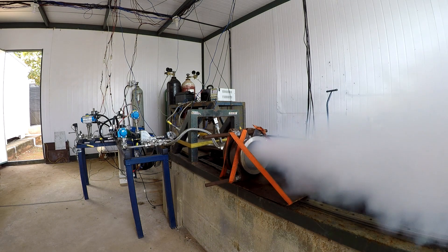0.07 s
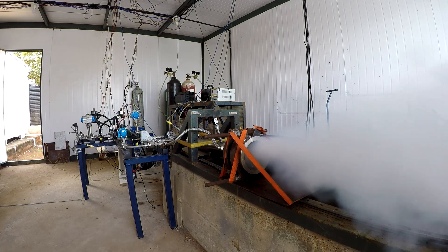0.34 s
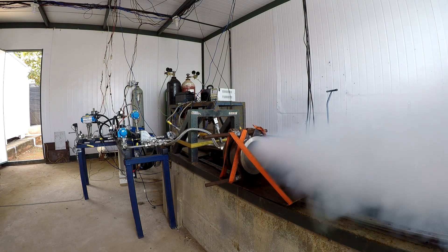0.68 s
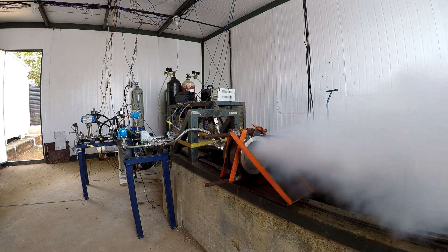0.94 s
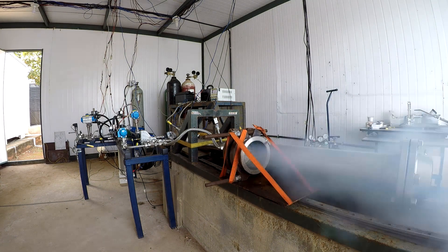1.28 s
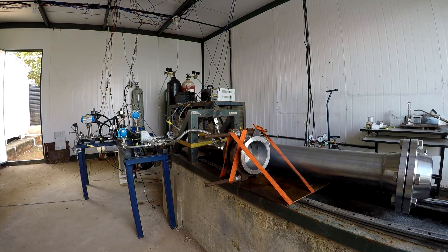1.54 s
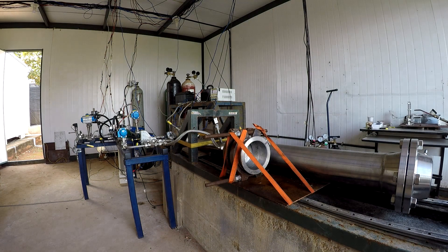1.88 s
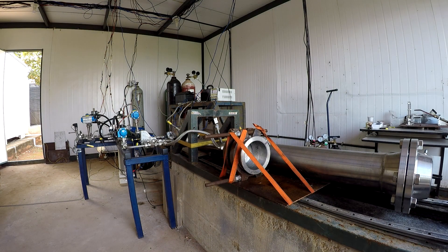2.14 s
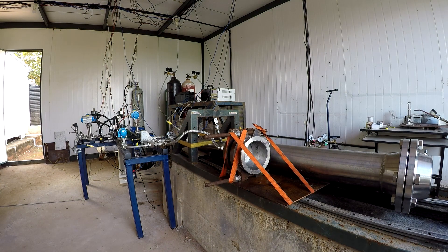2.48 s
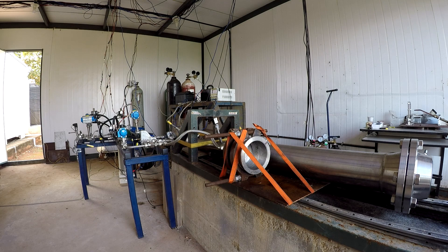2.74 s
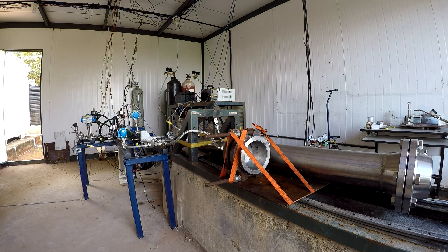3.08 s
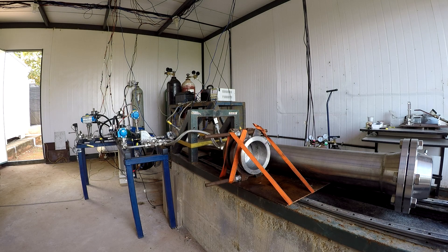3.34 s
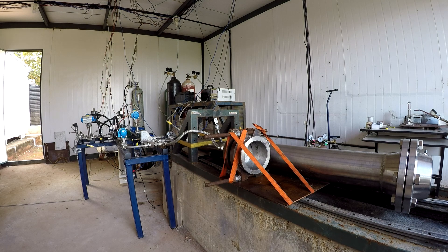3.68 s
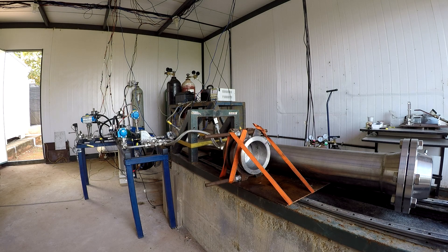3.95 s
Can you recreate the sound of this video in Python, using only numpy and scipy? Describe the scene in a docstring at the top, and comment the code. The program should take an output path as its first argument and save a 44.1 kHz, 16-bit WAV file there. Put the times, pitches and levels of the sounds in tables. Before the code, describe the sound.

A loud roaring hiss of gas cuts off, leaving steel ringing over a quiet equipment hum.

```python
"""Gas blast in a steel duct

Gas rushes from a nozzle into a steel duct in a small room, with a low roar and a broad hiss.
The flow thins and brightens, whistles briefly and is shut off. The steel rings on over humming
equipment. The camera's gain control, pushed down by the blast, slowly brings the quiet room back up."""
import sys
import numpy as np
from scipy import signal
from scipy.fft import rfft, irfft
from scipy.io import wavfile
from scipy.ndimage import uniform_filter1d, minimum_filter1d

SR = 44100
rng = np.random.default_rng(int(sys.argv[2]) if len(sys.argv) > 2 else 0)


def log_audio(samples):
    """Write samples as a 16-bit WAV file to the path given in sys.argv[1]."""
    # one column per channel
    frames = np.atleast_2d(samples).T
    # limit to full scale, then quantise
    limited = np.clip(frames, -1, 1)
    pcm = np.round(limited * 32767).astype(np.int16)
    wavfile.write(sys.argv[1], SR, pcm)


N = 176400
T = np.arange(-SR, N) / SR  # time in seconds; the jet starts one second before we listen

# How loud the jet is. Each row: time in seconds, roar level in dB, hiss level in dB.
# All levels in these tables come before the gain control.
JET_LEVELS = [(0, 0, -2), (.9, 0, -0.5), (1.2, -2, -1.5), (1.33, -4.5, -4.5), (1.43, -5, -6),
              (1.52, -11.5, -13), (1.62, -18.5, -16.5), (1.72, -26, -26), (1.81, -25.5, -32)]
# The fine sizzle, strongest as the flow thins. Each row: time in seconds, level in dB.
SIZZLE_LEVELS = [(0, -24), (1.0, -13.5), (1.2, -8), (1.34, -3.5), (1.42, -5.5), (1.55, -10), (1.7, -16),
                 (1.81, -17)]
# The tone colours of the jet's three noises. Each row: frequency in Hz, relative strength in dB.
ROAR_SPECTRUM = [(12, -16), (28, -8), (50, -10), (75, -7.5), (95, -16), (125, -12), (200, -11.5),
                 (320, -6.5), (440, -2.5), (560, -1), (690, -5), (780, -13), (950, -20.5), (1500, -40),
                 (4000, -70)]
HISS_SPECTRUM = [(300, -17), (900, -6.5), (1150, -5), (1430, 0), (1900, -3.5), (2500, -4), (3300, -1),
                 (4100, 0), (4750, -2.5), (5850, -1), (6400, -6), (7300, -10.5), (8600, -6.5),
                 (9700, -10.5), (12400, -16), (13100, -15), (15500, -20.5)]
SIZZLE_SPECTRUM = [(2000, -14), (5000, -2), (7300, -5), (8900, -1), (10300, -3), (11200, -5.5), (12400, -2),
                   (13100, -8.5), (15500, -5.5)]
# Where the air in the duct resonates. Each row: frequency in Hz, width in Hz, boost in dB.
DUCT_RESONANCES = [(374, 34, 1), (433, 19, 5.5), (542.4, 19, 9), (674, 28, 1)]
# The whistle of the last gas. Each row: time in seconds, pitch in Hz, level in dB.
WHISTLE_PATH = [(1.5, 4800, -25.5), (1.6, 4870, -24), (1.7, 4950, -29), (1.82, 5036, -27.5)]
# The steel's ringing notes, each with a slightly higher twin. Each row: pitch in Hz, level in dB under
# the opening jet, seconds to fade by 60 dB, gap to the twin in Hz, twin's size as a share of the note.
STEEL_NOTES = [(534.8, -44.5, 8.8, 0.693, 0.18), (1400, -54, 5.8, 1, .2), (1703, -34, 3, 0.21, 0.22),
               (2100, -57, 6.9, .9, .2), (2760, -38, 4.3, 0.82, 0.21), (3334, -44.5, 6.64, 0.786, 0.41),
               (4370, -50.5, 7.1, 7, 0.44), (4450, -56, 5.5, 4, .5), (4651, -51.5, 4.7, 5.5, .5),
               (5240, -50.5, 6.4, 9, 0.53), (5313, -55, 5.3, 3, .6), (5600, -53, 5.7, 6, 0.53),
               (6190, -54, 7.1, 19, 0.62), (7200, -54, 4.5, 8, .6), (7300, -55, 5.1, 5, .6),
               (10300, -64, 5.5, 3.9, .4)]
# The tone colour of the steel's weak overtones. Each row: frequency in Hz, relative strength in dB.
SHIMMER_SPECTRUM = [(2000, -19), (2850, 0), (3700, -7.5), (4600, 0), (6300, -2), (6700, -5), (7200, 4),
                    (8000, -2), (9500, -12), (12500, -24), (15000, -24)]
# The equipment's hum. Each row: pitch in Hz, level in dB, typical waver in dB.
HUM_TONES = [(373.5, -49.5, 2.7), (1136, -56, 1), (8355, -64.5, 0)]
# The tone colours of the background noises. Each row: frequency in Hz, relative strength in dB.
RUMBLE_SPECTRUM = [(10, -10), (22, 0), (38, 3), (56, -3), (80, -2), (94, -11), (106, -6), (125, -17),
                   (160, -30), (400, -50.5)]
AIR_SPECTRUM = [(60, -6), (150, -6), (190, -2.5), (240, -1.5), (275, -1), (330, -1.5), (430, 0), (490, -7),
                (700, -7.5), (850, -8.5), (1200, -8), (1800, -14), (3000, -17), (5000, -22), (8000, -28.5),
                (11000, -35), (15500, -44)]
FAINT_HISS_SPECTRUM = [(2000, -6), (6000, 3), (10000, -4), (15500, -15)]
# Room resonances in the rumble and air noise. Each row: frequency in Hz, width in Hz, boost in dB.
RUMBLE_RESONANCES = [(80.5, 11.4, 8.5)]
AIR_RESONANCES = [(241, 20, 6), (308, 25, 3.5), (431, 28, 2.5), (687, 43, 6.5)]
# A faint treble hiss that comes and goes. Each row: time in seconds, level in dB.
FAINT_HISS_LEVELS = [(2.3, -55.5), (2.95, -61), (3.15, -61), (3.29, -74), (3.4, -65), (3.56, -63),
                     (3.74, -82), (3.92, -61), (4, -65)]


def jet(roar_flutter_db=1.54, hiss_flutter_db=0.5, flutter_hz=45):
    """Swirling gas roars in the duct, while the nozzle hisses, sizzles and finally whistles."""
    roar = noise(ROAR_SPECTRUM, DUCT_RESONANCES)
    roar *= from_db(curve(JET_LEVELS, column=1) + roar_flutter_db * wobble(flutter_hz))
    hiss = noise(HISS_SPECTRUM) * from_db(curve(JET_LEVELS, column=2))
    sizzle = noise(SIZZLE_SPECTRUM) * from_db(curve(SIZZLE_LEVELS))
    nozzle = whistle() + (hiss + sizzle) * from_db(hiss_flutter_db * wobble(flutter_hz))
    return (roar + nozzle) * valve()


def whistle(fade_in_s=0.063, jitter_hz=29.7, flutter_db=4):
    """The last of the gas makes a shaky, slightly rising note at the nozzle."""
    start_s = WHISTLE_PATH[0][0]
    fade_in = np.clip((T - start_s) / fade_in_s, 0, 1)
    note = tone(curve(WHISTLE_PATH, column=1) + jitter_hz * wobble(122))
    level_db = curve(WHISTLE_PATH, column=2) + flutter_db * wobble(80)
    return fade_in * note * from_db(level_db)


def valve(shut_s=1.795, fall_db_per_s=450):
    """The valve stays open (a gain of 1), then quickly chokes off the gas."""
    return from_db(-fall_db_per_s * np.maximum(T - shut_s, 0))


def steel(in_step_s=1.6):
    """The jet sets the duct ringing. Each note and its twin slip in and out of step, so they throb."""
    opening_hiss_db = JET_LEVELS[0][2]
    jet_power = (from_db(curve(JET_LEVELS, column=2) - opening_hiss_db) * valve()) ** 2
    phase_per_hz = 2 * np.pi * (T - in_step_s)
    ring = 0
    for hz, db, fade_s, gap_hz, twin_share in STEEL_NOTES:
        pair = np.sin(hz * phase_per_hz) + twin_share * np.sin((hz + gap_hz) * phase_per_hz)
        ring += np.sqrt(2) * from_db(db) * pair * ring_strength(jet_power, fade_s)
    return ring + shimmer(jet_power)


def shimmer(jet_power, count=150, level_db=-38, fade_s=3.9):
    """Many weak, high overtones of the steel ring together."""
    spectrum = np.zeros(len(T) // 2 + 1, complex)
    for place, size, phase in rng.random((count, 3)):
        hz = 2200 * 6 ** place  # scattered from 2200 to 13200 Hz
        strength = size * from_db(spectrum_db(SHIMMER_SPECTRUM, hz))
        spectrum[int(hz * len(T) / SR)] = strength * np.exp(2j * np.pi * phase)
    overtones = normalize(irfft(spectrum, len(T)))
    return overtones * from_db(level_db) * ring_strength(jet_power, fade_s)


def ring_strength(jet_power, fade_s):
    """Steel stores the jet's energy and lets it go slowly, losing 60 dB in fade_s seconds."""
    kept = np.exp(-2 * np.log(1000) / (fade_s * SR))  # share of energy left after one sample
    energy, _ = signal.lfilter([1 - kept], [1, -kept], jet_power, zi=[jet_power[0]])
    return np.sqrt(energy)


def room(sound, paths=5, stir_hz=12):
    """The jet stirs the air, so its sound wanders between different echo paths."""
    shares = np.array([wobble(stir_hz) for _ in range(paths)])
    shares /= np.linalg.norm(shares, axis=0)
    echoes = sum(signal.fftconvolve(sound * share, wall_echoes())[:len(sound)] for share in shares)
    return (sound + echoes) / np.sqrt(2)  # equal parts direct sound and echo


def wall_echoes(split_hz=5000, low_fade_s=0.75, high_fade_s=0.49):
    """Sound scatters off the walls for one second, and the treble dies first."""
    t = np.arange(SR) / SR
    scatter = rng.standard_normal(SR)
    low = signal.sosfilt(signal.butter(2, split_hz, fs=SR, output="sos"), scatter)
    high = signal.sosfilt(signal.butter(2, split_hz, "high", fs=SR, output="sos"), scatter)
    echoes = low * from_db(-60 * t / low_fade_s) - high * from_db(-60 * t / high_fade_s)
    return echoes / np.linalg.norm(echoes)


def equipment(drift_hz=2.04, rumble_db=-43.5, swell_db=1.5, air_db=-48):
    """Machines give a wavering hum and move the air, with an uneven rumble and a faint hiss."""
    hum = 0
    for hz, db, waver_db in HUM_TONES:
        hum += tone(hz + drift_hz * wobble(7.7)) * from_db(db + waver_db * wobble(3.7))
    rumble = noise(RUMBLE_SPECTRUM, RUMBLE_RESONANCES) * from_db(rumble_db + swell_db * wobble(10))
    air = noise(AIR_SPECTRUM, AIR_RESONANCES) * from_db(air_db)
    faint_hiss = noise(FAINT_HISS_SPECTRUM) * from_db(curve(FAINT_HISS_LEVELS))
    return hum + rumble + air + faint_hiss


def from_db(db):
    """Turn decibels into a number to multiply by."""
    return 10 ** (np.asarray(db) / 20)


def normalize(sound):
    """Scale a signal so its typical size (root mean square) is 1."""
    return sound / np.sqrt(np.mean(sound ** 2))


def curve(table, column=1):
    """Join one column's values with straight lines over time."""
    rows = np.array(table, float)
    return np.interp(T, rows[:, 0], rows[:, column])


def spectrum_db(spectrum, hz):
    """Look up a tone colour at any frequency, giving each octave equal space."""
    rows = np.array(spectrum, float)
    return np.interp(np.log(np.maximum(hz, 1)), np.log(rows[:, 0]), rows[:, 1])


def noise(spectrum, resonances=()):
    """Noise with a given tone colour, boosted around each resonance."""
    hz = np.fft.rfftfreq(len(T), 1 / SR)
    db = spectrum_db(spectrum, hz)
    for centre_hz, width_hz, boost_db in resonances:
        db += boost_db / (1 + (2 * (hz - centre_hz) / width_hz) ** 2)
    white = rfft(rng.standard_normal(len(T)))
    return normalize(irfft(white * from_db(db), len(T)))


def wobble(rate_hz):
    """A smooth random wiggle of typical size 1, mostly slower than rate_hz."""
    hz = np.fft.rfftfreq(len(T), 1 / SR)
    white = rfft(rng.standard_normal(len(T)))
    return normalize(irfft(white / (1 + (hz / rate_hz) ** 2) ** 2, len(T)))


def tone(hz):
    """A pure tone that follows a moving pitch."""
    cycles = np.cumsum(hz) / SR + rng.random()
    return np.sqrt(2) * np.sin(2 * np.pi * cycles)


def gain_control(sound, ceiling_db=-14.5, window_s=0.28, hold_s=0.58, recover_db_per_s=16.0):
    """An automatic volume knob: it turns loud sound down, waits, then comes steadily back up."""
    power = uniform_filter1d(sound ** 2, int(window_s * SR))
    level_db = 10 * np.log10(np.maximum(power, 1e-12))
    wanted_db = np.minimum(0, ceiling_db - level_db)
    half_hold = int(hold_s * SR / 2)
    held_db = minimum_filter1d(wanted_db, 2 * half_hold + 1, origin=half_hold, mode="nearest")
    climb_db = recover_db_per_s * np.arange(N) / SR  # the gain may rise no faster than this ramp
    return from_db(np.minimum.accumulate(held_db - climb_db) + climb_db)


def scene():
    """The echoing jet, the ringing steel and the equipment, the same in both ears."""
    mono = (room(jet()) + steel() + equipment())[-N:]
    return np.array([mono, mono])


def record(dry):
    """The camera sets its own volume and cuts the highest treble."""
    treble_cut = signal.ellip(10, 0.2, 80, 15300, fs=SR, output="sos")  # cuts above 15300 Hz
    return signal.sosfilt(treble_cut, dry * gain_control(dry[0]))


dry = scene()
out = record(dry)
log_audio(out)
```